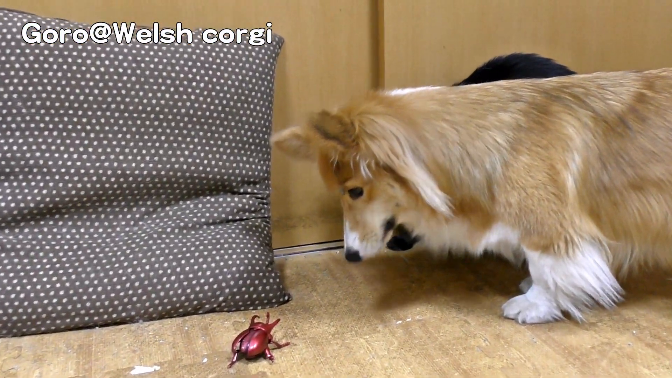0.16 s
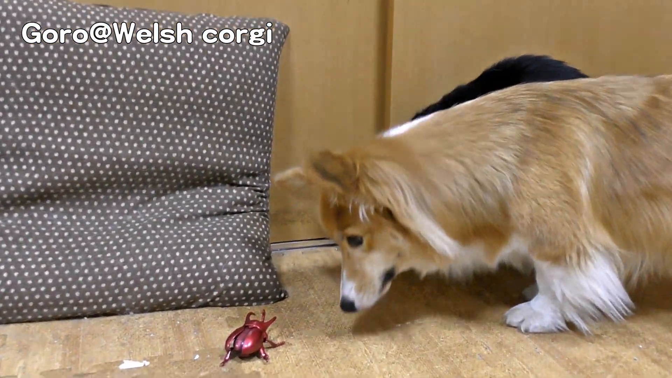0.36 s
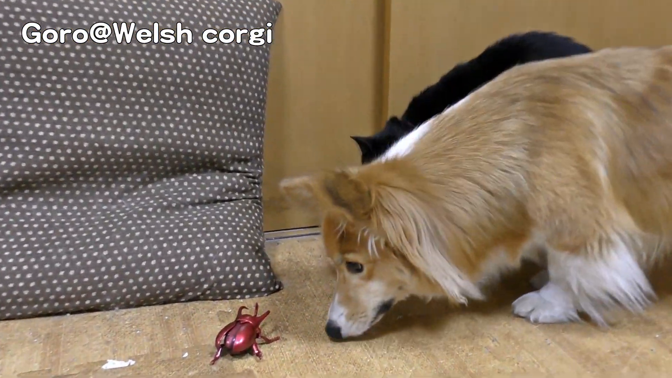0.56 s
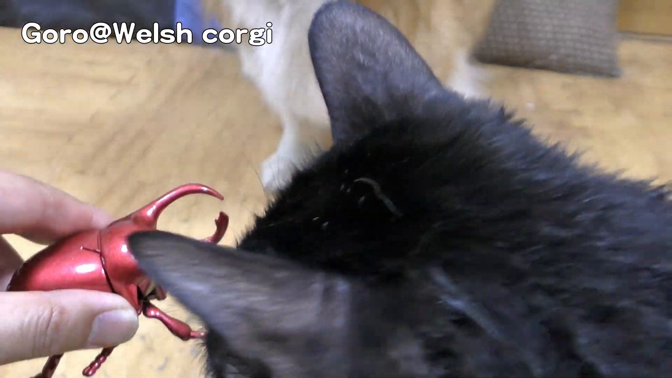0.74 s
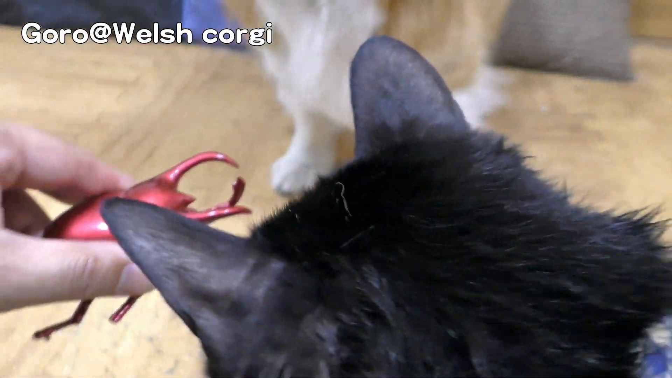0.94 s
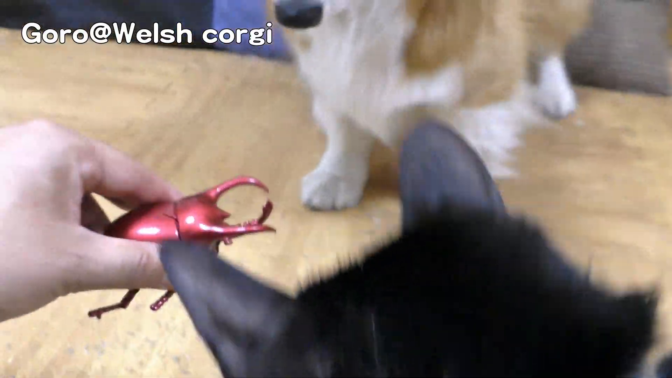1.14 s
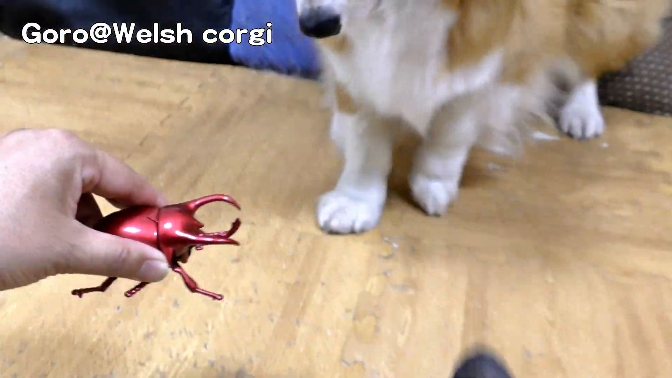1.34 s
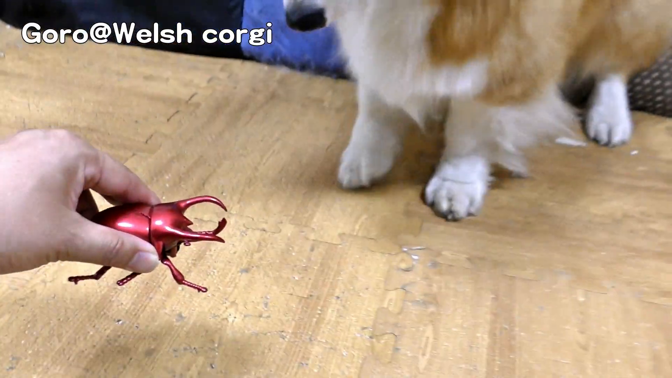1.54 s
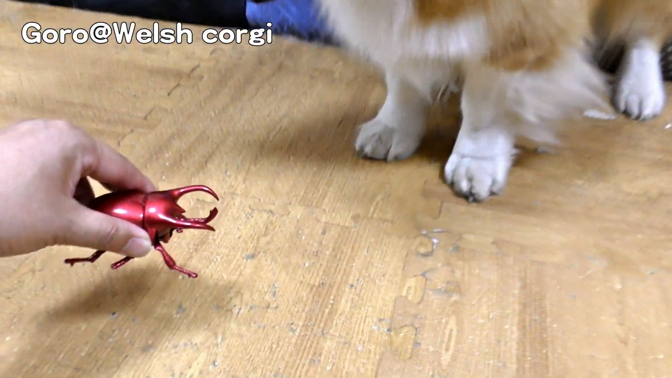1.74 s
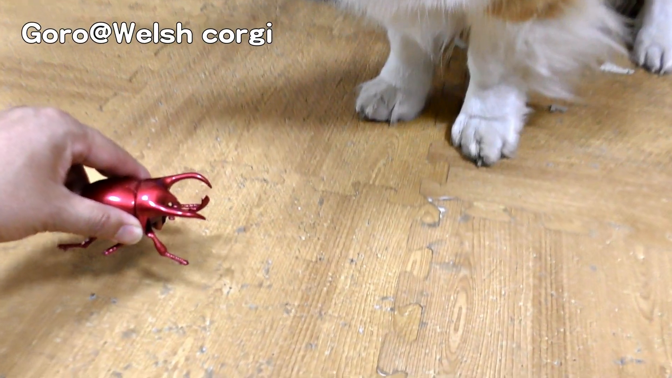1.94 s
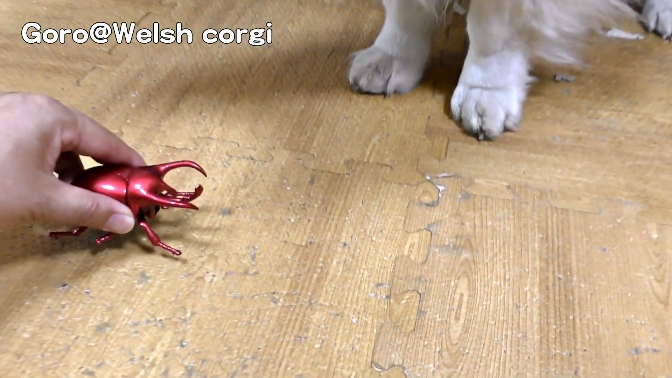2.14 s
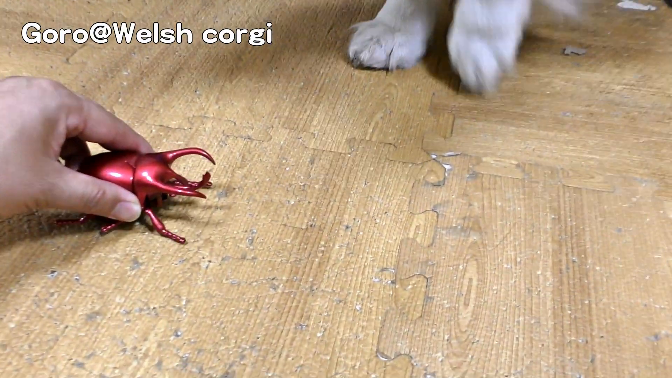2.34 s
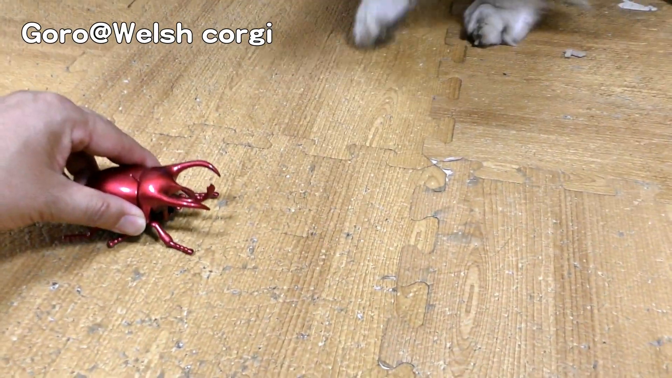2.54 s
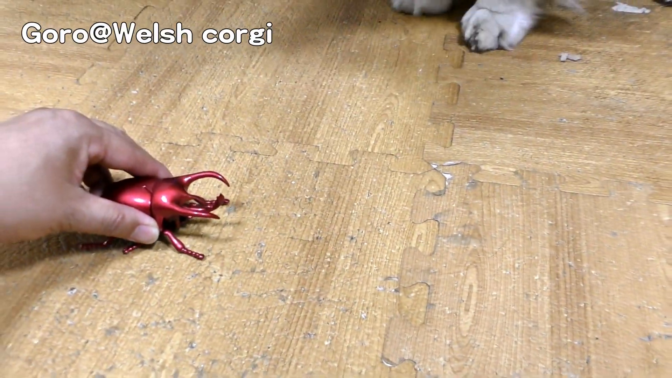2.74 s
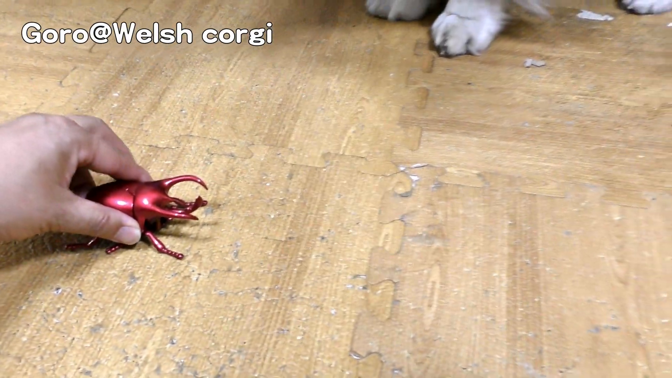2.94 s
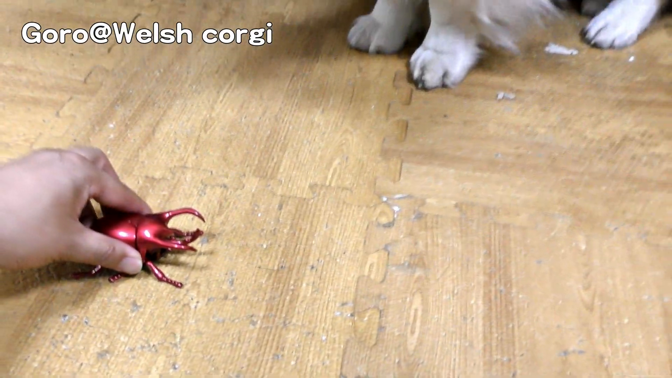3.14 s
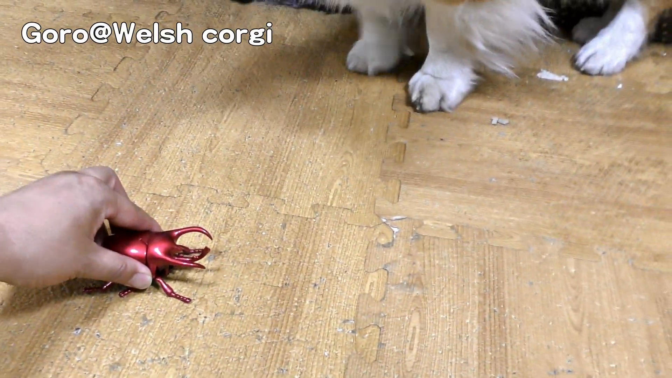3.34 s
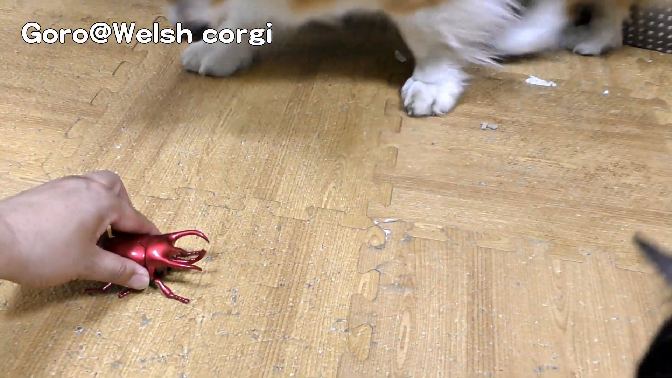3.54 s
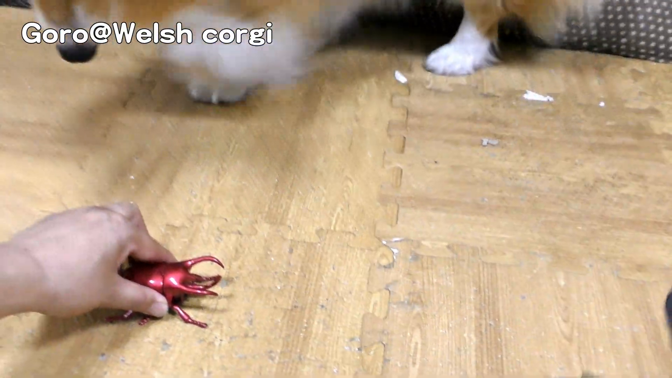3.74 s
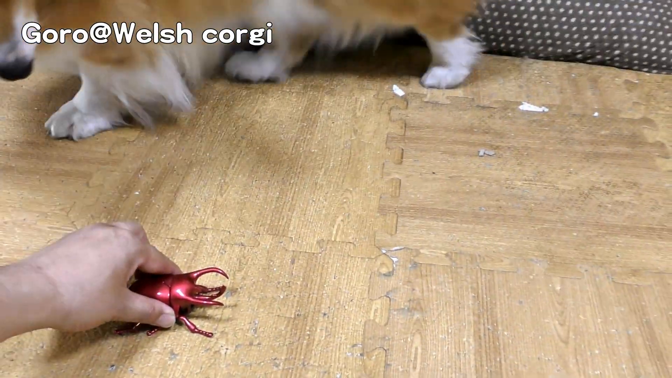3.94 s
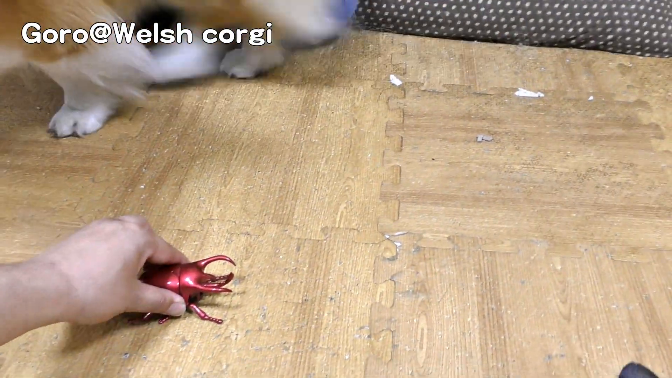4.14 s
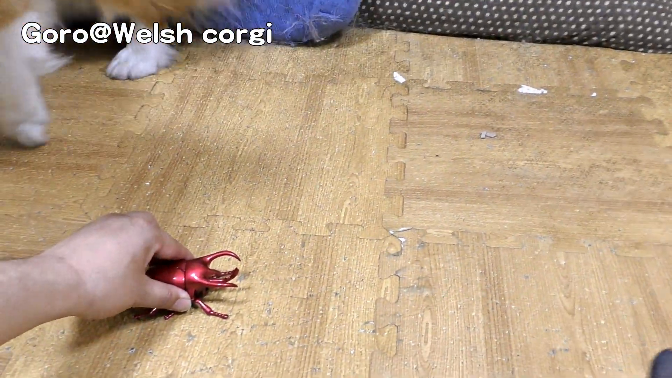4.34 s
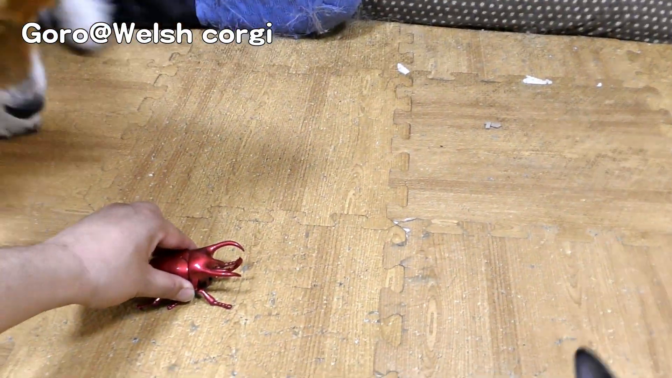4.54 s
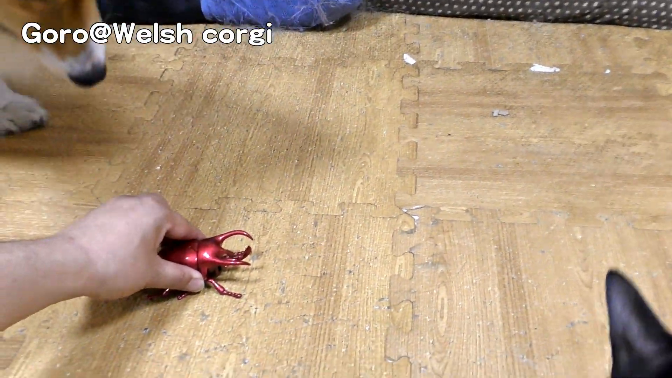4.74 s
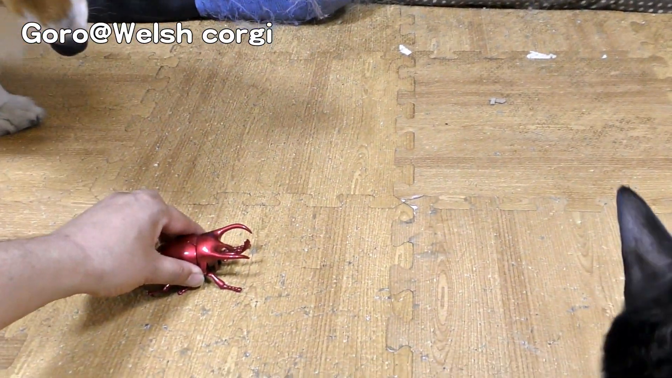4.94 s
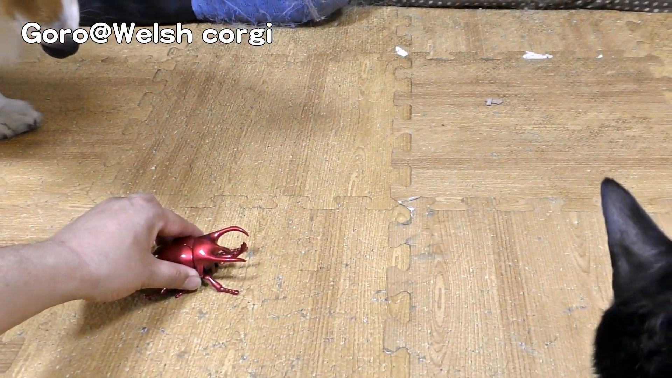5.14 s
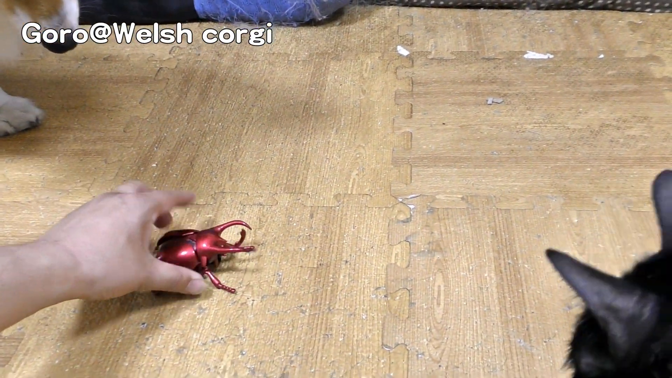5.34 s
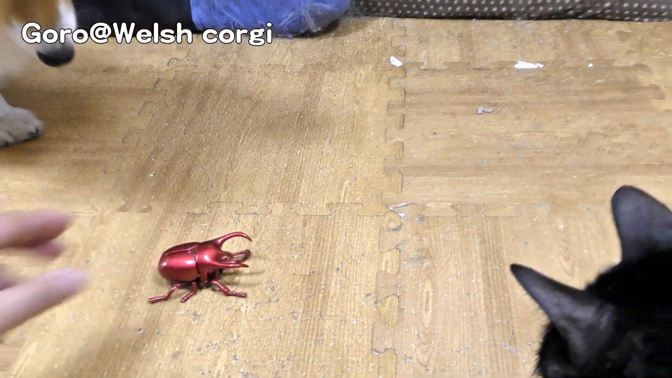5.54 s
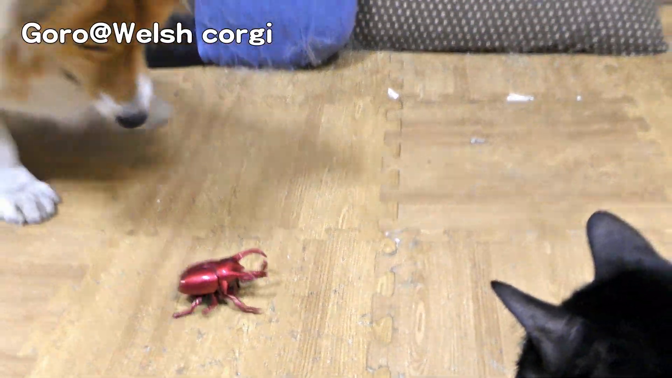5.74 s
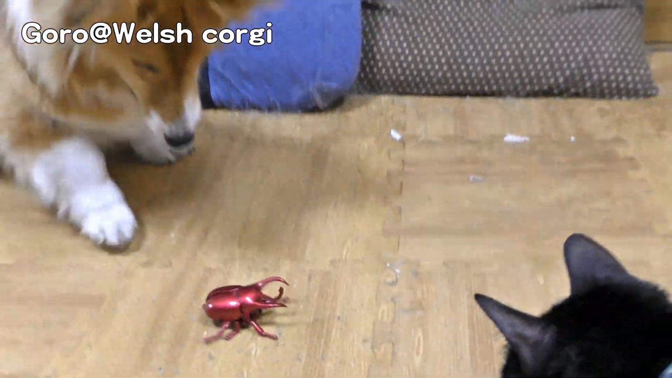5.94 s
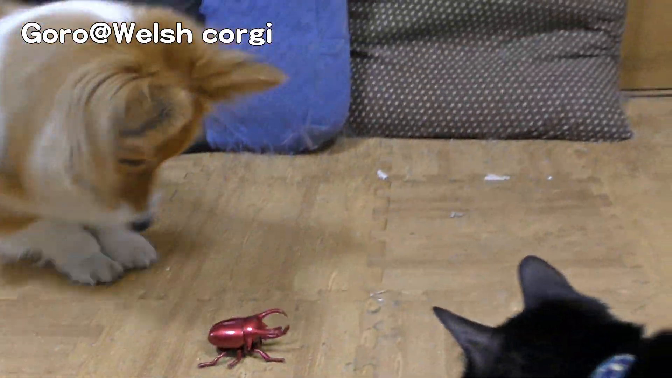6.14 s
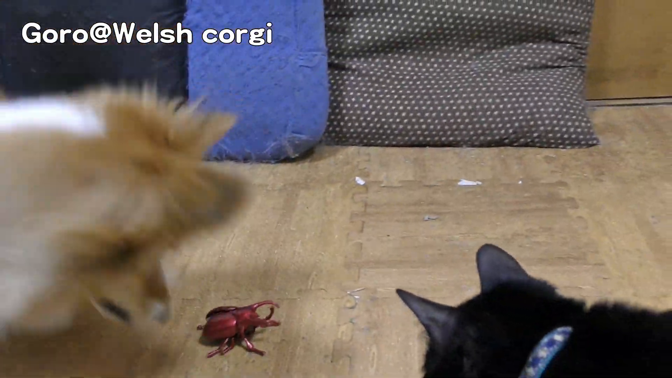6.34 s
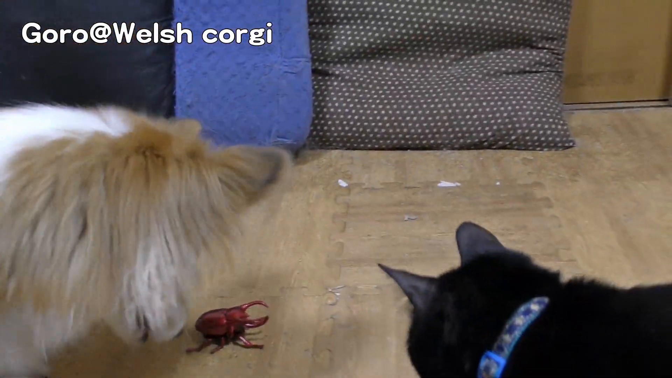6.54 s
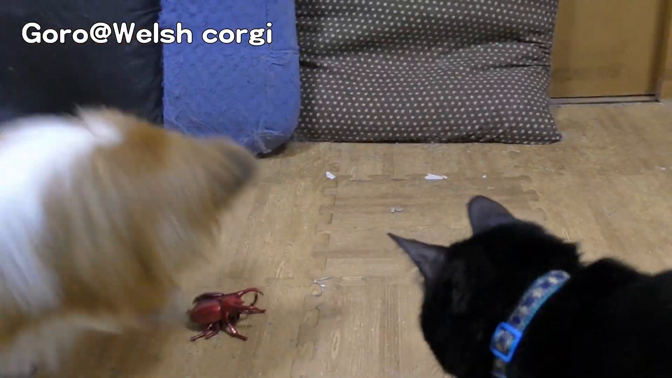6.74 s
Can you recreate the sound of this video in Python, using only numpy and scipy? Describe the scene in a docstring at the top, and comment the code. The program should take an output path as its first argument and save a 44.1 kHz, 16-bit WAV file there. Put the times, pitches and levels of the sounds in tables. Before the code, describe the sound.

In a quiet, faintly humming room, a held toy clicks and scrapes, then is released and rattles away in a bright, pulsing clockwork whirr.

```python
"""First come light clicks, scuffs and rubbing: a hand holds a plastic wind-up beetle while a dog pads about.
Clicks are tiny noise snaps with a body ring, scuffs are grainy puffs, rubbing is noise that swells and fades.
Let go, the beetle whirrs off: escapement blows rattle its shell, slowing and speeding with each push of its legs.
Its legs then tap the mat: a noise tap and a damped low note. The small, quiet living room hums and hisses
throughout, as filtered noise and three tones."""
import sys
import numpy as np
from scipy import signal
from scipy.fft import rfft, irfft, next_fast_len
from scipy.io import wavfile
from scipy.ndimage import uniform_filter1d, map_coordinates

SR = 44100
rng = np.random.default_rng(int(sys.argv[2]) if len(sys.argv) > 2 else 0)


def write(x):
    x = np.atleast_2d(x).T
    wavfile.write(sys.argv[1], SR, np.round(np.clip(x, -1, 1) * 32767).astype(np.int16))

N = 299439
TIME = np.arange(N) / SR  # seconds
TOP_HZ = 15900  # nothing sounds above this

# The room's steady noise, relative levels: pitch_hz, level_db
ROOM_NOISE = [(12, -68), (20, -17), (65, -8), (86, -3.5), (154, -3), (357, -16.5), (388, -17), (513, -19.5),
              (678, -25), (923, -20), (1860, -20), (2260, -19.5), (5380, -37), (12100, -34.5), (16000, -34)]
# How alike the room noise is at left and right: pitch_hz, likeness (1 = the same)
ROOM_LIKENESS = [(25, .55), (70, 0.84), (240, 0.63), (950, 0.35), (3770, 0.38), (15000, 0.62)]
# How long the walls' echo takes to fall by 60 dB: pitch_hz, decay_s
WALL_DECAY = [(200, 0.15), (2000, 0.27), (12000, 0.12)]

# Strokes of hand and toy over the mat: peak_s, rise_s, fall_s, rub_db, hiss_db
STROKES = [(1.25, 0.024, 0.056, -57.5, -63), (1.49, 0.11, 0.14, -63, -61.5), (2.45, 0.29, 0.21, -61, -67.5),
           (3.01, 0.043, 0.24, -51.5, -71), (3.14, 0.11, 0.15, -56.5, -57), (3.72, 0.3, 0.2, -64.5, -69.5),
           (4.0, 0.11, 0.066, -61.5, -59.5), (4.33, 0.18, 0.17, -62.5, -64), (4.77, .05, .09, -50, -61.5),
           (5.288, 0.0066, 0.017, -61.5, -49.5)]
# Tone of the dull rubbing, relative levels: pitch_hz, level_db
RUB_TONE = [(88, -43), (150, -22), (190, -19), (312, -3), (457, -1), (570, -26), (953, -5), (2330, -6),
            (5000, -25.5), (6500, -53), (11000, -120)]
# Tone of the bright rubbing, relative levels: pitch_hz, level_db
HISS_TONE = [(2000, -1), (4000, 4), (7000, -0.5), (11000, 0), (16000, -9)]
GRIP_DB, GRIP_RATE = 1.65, 45  # the fingers catch and slip: depth, random points a second

# Short scuffs of paws and fingers: start_s, level_db, body_hz, decay_s (to fall by 60 dB)
SCUFFS = [(0.377, -44, 1900, 0.12), (1.077, -45, 2680, 0.22), (1.195, -41.5, 1510, 0.11),
          (1.421, -41.5, 2600, 0.37), (1.64, -40.5, 1290, 0.26), (2.482, -38, 1420, 0.072),
          (2.504, -37, 1800, 0.19), (2.575, -40.5, 2560, 0.11), (2.75, -45, 1550, 0.24),
          (3.698, -43, 2230, .08), (3.907, -44.5, 1240, 0.2), (4.002, -50, 2270, 0.77),
          (4.285, -40.5, 1620, 0.11), (4.513, -44.5, 1620, 0.51), (4.564, -42, 1340, 0.14),
          (4.792, -40.5, 1470, 0.34), (4.839, -28, 1290, 0.16)]
SCUFF_TICK_DB = -10  # sets the treble of a scuff

# Claws and plastic parts clicking: start_s, level_db, body_hz, tick_db (higher is brighter)
CLICKS = [(0.258, -36, 1890, -14), (0.342, -17.5, 1830, -6), (0.416, -24.5, 940, -8.5),
          (0.671, -39.5, 1090, -24), (1.186, -28, 1530, -12), (1.366, -33.5, 970, -22),
          (1.421, -20.5, 2080, -15), (1.642, -36, 1230, -24), (2.369, -32, 3600, 13),
          (2.501, -22.5, 1520, -13), (2.75, -31.5, 1590, -27), (2.797, -37.5, 2170, -15),
          (2.975, -33, 650, -26), (3.299, -26, 1290, -39), (3.316, -22, 966, -8.5), (3.508, -33, 2310, -3),
          (3.601, -27.5, 2020, -32), (3.612, -30, 1920, -12), (3.889, -35, 2510, -7),
          (3.909, -36, 1400, -6), (3.955, -32, 2440, -9), (3.976, -26, 2950, 0.5), (4.002, -32, 1860, -1),
          (4.068, -34.5, 2560, -12), (4.188, -32.5, 1330, -7), (4.216, -36, 2500, 3),
          (4.274, -26.5, 2820, -8.5), (4.335, -32.5, 2870, -12), (5.071, -36, 2170, -10),
          (5.276, -26.5, 2340, 12.5)]
KNOCK_DB, KNOCK_DB_PER_OCTAVE = -6.5, -12  # low knock of a 1 kHz body; higher-pitched bodies knock less
FIDGET_COUNT, FIDGET_LOUDEST_DB = 18, -41.5  # faint ticks of the toy in the fingers
HELD_START_S, HELD_END_S = 2.3, 4.9  # the toy is pressed to the mat

# Soft paw falls: start_s, level_db, pitch_hz
PAWS = [(1.188, -48.5, 181), (1.443, -43, 148), (3.999, -47.5, 223), (4.288, -42.5, 178),
        (4.602, -47.5, 240), (4.706, -43.5, 238), (4.862, -38, 169)]
# The beetle's legs landing on the mat: start_s, tap_db, thud_db
LEG_STEPS = [(5.734, -37, -37), (5.808, -50, -40), (5.871, -34, -39.5), (5.973, -31.5, -40.5),
             (6.058, -49, -39), (6.218, -33.5, -37), (6.250, -38, -37), (6.392, -29.5, -37),
             (6.494, -34, -38.5), (6.525, -28, -41), (6.558, -37.5, -33), (6.617, -36.5, -37.5),
             (6.758, -22, -33.5)]
# Tone of a leg tip's tap, relative levels: pitch_hz, level_db
TAP_TONE = [(180, -20), (300, -5), (674, -19), (1480, -3), (1960, -2), (2270, -3), (3000, -36), (3900, -41),
            (6600, -120)]
# Tone of the soft mat, relative levels: pitch_hz, level_db
MAT_TONE = [(30, -22), (80, 0), (140, 0), (320, -6), (600, -20), (2000, -38)]
LEG_THUD_HZ, LEG_THUD_SPREAD = 198, .2  # middle of the mat's notes, their random spread as a share
THUD_LAG_S = 0.00405  # the thud follows the tip's tap

# Tone of the plastic shell with the hand still close, relative levels: pitch_hz, level_db
SHELL_HELD_TONE = [(530, -65), (900, -34), (1050, -21.5), (1320, -11.5), (1910, -19.5), (2200, -8),
                   (3110, 0.5), (4080, -8), (4660, -2.5), (5310, -8), (7320, -5), (8050, -7), (10800, -1.5),
                   (15500, -13.5)]
# Tone of the shell walking free, relative levels: pitch_hz, level_db
SHELL_FREE_TONE = [(530, -31.5), (900, -33.5), (1170, -16), (1500, -17.5), (1980, -16), (2790, -0.5),
                   (3070, -2), (3760, -10), (4330, -3.5), (5500, -13.5), (6650, -3.5), (8150, -7),
                   (8960, -4), (10800, -1), (15500, -17.5)]
# Each push of the legs brakes the clockwork; gears take part of the rattle dip: peak_s, rattle_dip_db, shell_dip_db
PUSHES = [(5.479, 7, 5.5), (5.658, 6, 5.5), (5.810, 7, 4.5), (6.004, 3.5, 0.5), (6.162, 6, 2),
          (6.360, 7, 4.5), (6.512, 5.5, 1.5), (6.716, 5.5, 9)]
RELEASE_S = 5.312  # the hand lets the spring go
STEEL_DB, GEARS_DB, SHELL_DB = -29, -33, -35  # base levels of steel rattle, gear clatter and shell ring
SPIN_UP_DB, SPIN_UP_S = 17, .025  # how far below speed steel and gears start, how fast they catch up
LOAD_S, UNLOAD_S = .04, .022  # a push loads the spring slowly and lets go quickly
FILL_DB, FILL_S = 4, .05  # the shell's ring lags behind the wheels: by how much, for how long
STEEL_SURGE_DB, STEEL_SURGE_S = 7.5, .18  # the escapement races while the legs are still unloaded
BODY_SURGE_DB, BODY_SURGE_S = 5.4, 0.24  # gears settle more slowly; the shell takes part of this surge


def amp(db):
    """Decibels to gain."""
    return 10 ** (np.asarray(db) / 20)


def unit(x):
    """Bring a sound to an average strength (rms) of 1."""
    return x / np.sqrt(np.mean(x ** 2) + 1e-20)


def along(points, hz):
    """Read a (pitch_hz, value) table at any pitch, on a log pitch scale."""
    f, v = np.transpose(points)
    return np.interp(np.log(hz + 1), np.log(f + 1), v)


def wobble(rate):
    """A smooth random curve through this many random points a second."""
    return map_coordinates(rng.standard_normal(int(N * rate / SR) + 4), [TIME * rate])


def coloured(x, points):
    """Filter a sound to the gains of a (pitch_hz, level_db) table, with no sound ahead of its cause."""
    n = x.shape[-1]
    m = 2 * next_fast_len(n // 2 + 2048)
    log_gain = np.log(amp(along(points, np.fft.rfftfreq(m, 1 / SR))))
    # Folding the cepstrum forward in time makes the filter minimum phase.
    cepstrum = irfft(log_gain)
    cepstrum[1:m // 2] *= 2
    cepstrum[m // 2 + 1:] = 0
    return irfft(rfft(x, m) * np.exp(rfft(cepstrum)), m)[..., :n]


def below(x, hz):
    """The part of a sound under a given pitch."""
    return signal.sosfiltfilt(signal.butter(6, hz, fs=SR, output="sos"), x)


def add(track, s, sound):
    """Mix a sound into a track at time s."""
    part = track[round(s * SR):][:len(sound)]
    part += sound[:len(part)]


def burst(t60, attack, points, grain_db):
    """A coloured, grainy puff of noise that rises and dies (t60: seconds to fall by 60 dB)."""
    t = np.arange(SR // 3) / SR
    shape = amp(-60 * t / max(t60, .003)) * (1 - np.exp(-t / attack))
    knots = t[::60]
    grain = unit(amp(grain_db * np.interp(t, knots, rng.standard_normal(len(knots)))))
    puff = coloured(shape * grain * rng.standard_normal(len(t)), points)
    # The table sets only the tone: the puff's energy is brought back to that of its shape.
    return puff / np.sqrt(np.sum(puff ** 2) / np.sum(shape ** 2)) / shape.max() / 2


def contact_colour(body_hz, tick_db):
    """Tone of a contact: a low knock, one broad body resonance and a bright tick."""
    hz = np.geomspace(60, 16000, 60)
    knock_db = KNOCK_DB + KNOCK_DB_PER_OCTAVE * np.log2(body_hz / 1000)
    broad = [(60, knock_db - 5), (280, knock_db + 10), (680, knock_db / 2 - 5.0), (1050, -2.0), (3400, -6.0),
             (5500, tick_db - 7.5), (10500, tick_db - 3.0), (16000, tick_db - 18)]
    resonance_db = 9.6 * np.exp(-(np.log(hz / body_hz) / 0.25) ** 2)
    return np.transpose([hz, along(broad, hz) + resonance_db])


def in_room(x, wet_db, near_db, left_over_right_db):
    """Direct sound, a quick scatter off floor and bodies, and the walls' tail."""
    hz, t, z = signal.stft(rng.standard_normal((2, SR // 3)), SR, nperseg=256)
    tail = signal.istft(z * amp(-60 * t / along(WALL_DECAY, hz)[:, None]), SR, nperseg=256)[1]
    scatter = rng.standard_normal(tail.shape) * amp(-60 * np.arange(tail.shape[1]) / SR / 0.038)
    answer = amp(wet_db) * tail / np.linalg.norm(tail[0])
    answer = answer + amp(near_db) * scatter / np.linalg.norm(scatter[0])
    delayed = np.pad(np.atleast_2d(x), ((0, 0), (30, 0)))  # echoes start 30 samples late
    echoes = signal.fftconvolve(delayed, answer, axes=1)[:, :N]
    return (x + echoes) * amp([[left_over_right_db / 2], [-left_over_right_db / 2]])


def background():
    """Low household rumble with a faint hum, under an even hiss."""
    # Shared and opposite parts are mixed so that left and right are as alike as the table asks.
    turn = np.arccos(np.clip(along(ROOM_LIKENESS, np.fft.rfftfreq(N, 1 / SR)), -1, 1)) / 2
    noise = coloured(rng.standard_normal((2, N)), ROOM_NOISE)
    mid, side = irfft(rfft(noise) * [np.cos(turn), np.sin(turn)], N)
    hum = np.zeros(N)
    for hz, db in [(97, -67.0), (147, -62.5), (1885, -74.5)]:
        hum += amp(db + 0.91 * wobble(4.7)) * np.sin(2 * np.pi * hz * TIME + wobble(3.1))
    air = amp(-57.0) * unit(np.array([mid + side, mid - side]))
    return (air + hum) * amp([[-.7], [.7]])  # a little louder on the right


def friction_grains(tone):
    """Noise whose strength flickers finely, like many tiny catches of friction."""
    return unit(coloured(rng.standard_normal(N) * amp(2.3 * wobble(500)), tone))


def rubbing():
    """Fine grains of friction under the hand's strokes, each swelling and fading."""
    rub, hiss = np.zeros((2, N))
    for s, rise, fall, rub_db, hiss_db in STROKES:
        distance = np.clip((TIME - s) / np.where(TIME < s, rise, fall), -20, 20)
        swell = 1 / np.cosh(distance * np.sqrt(2))
        # Overlapping strokes add by power.
        rub = np.hypot(rub, amp(rub_db) * swell)
        hiss = np.hypot(hiss, amp(hiss_db) * swell)
    grip = amp(GRIP_DB * wobble(GRIP_RATE))
    return rub * grip * friction_grains(RUB_TONE) + hiss * friction_grains(HISS_TONE)


def scuffs():
    """Short slides that catch and slip on the mat's grain."""
    track = np.zeros(N)
    for s, db, body_hz, t60 in SCUFFS:
        add(track, s, amp(db) * burst(t60, 0.0019, contact_colour(body_hz, SCUFF_TICK_DB), grain_db=3.0))
    return track


def fidgets():
    """Faint random ticks while the toy is held, as rows like CLICKS."""
    rows = []
    for when, softness, size, hardness in rng.random((FIDGET_COUNT, 4)):
        start_s = HELD_START_S + (HELD_END_S - HELD_START_S) * when
        rows.append((start_s, FIDGET_LOUDEST_DB - 6 * softness, 1700 + 1300 * size, -9 + 12 * hardness))
    return rows


def clicks():
    """Hard contacts: a very short snap with the struck body's brief, duller ring."""
    track = np.zeros(N)
    for s, db, body_hz, tick_db in list(CLICKS) + fidgets():
        snap = burst(.003, .00005, contact_colour(body_hz, tick_db + 3), grain_db=0)
        ring = burst(0.032, 0.00036, contact_colour(body_hz, tick_db - 2), grain_db=4)
        add(track, s, amp(db) * (snap + amp(-5.5) * ring))
    return track


def thud(hz):
    """Weight on the mat: a dull, quickly damped note and a soft puff."""
    t = np.arange(SR // 3) / SR
    note = np.sin(2 * np.pi * hz * t) * amp(-60 * t / 0.12) * (1 - np.exp(-t / 0.001))
    return note + amp(-1.5) * burst(0.32, 0.0019, MAT_TONE, grain_db=2)


def steps():
    """The beetle's hard tips tap the mat and then thud into it; paws only thud."""
    track = np.zeros(N)
    for s, tap_db, thud_db in LEG_STEPS:
        add(track, s, amp(tap_db) * burst(0.082, 0.00057, TAP_TONE, grain_db=7))
        thud_hz = LEG_THUD_HZ * np.exp(LEG_THUD_SPREAD * rng.standard_normal())
        add(track, s + THUD_LAG_S, amp(thud_db) * thud(thud_hz))
    for s, db, hz in PAWS:
        add(track, s, amp(db) * thud(hz))
    return track


def drive():
    """Levels of steel, gears and shell: a surge on release, then a dip with every push of the legs."""
    age = np.maximum(TIME - RELEASE_S, 0)
    spin_up_db = SPIN_UP_DB * np.exp(-age / SPIN_UP_S)
    steel_surge_db = STEEL_SURGE_DB * np.exp(-(age / STEEL_SURGE_S) ** 2) - spin_up_db
    body_surge_db = BODY_SURGE_DB * np.exp(-(age / BODY_SURGE_S) ** 2) - spin_up_db
    lag_db = FILL_DB * np.exp(-(age / FILL_S) ** 2)
    rattle_dip, shell_dip = np.zeros((2, N))
    for s, rattle_db, shell_db in PUSHES:
        load = np.exp(-((TIME - s) / np.where(TIME < s, LOAD_S, UNLOAD_S)) ** 2)
        rattle_dip += rattle_db * load
        shell_dip += shell_db * load
    steel_db = STEEL_DB + steel_surge_db - rattle_dip + .3 * wobble(30)
    gears_db = GEARS_DB + body_surge_db - 0.37 * lag_db - 0.53 * rattle_dip + 0.61 * wobble(25)
    shell_db = SHELL_DB + .8 * body_surge_db - lag_db - shell_dip + 0.56 * wobble(35)
    return steel_db, gears_db, shell_db


def escapement(level_db, running, jitter_s, scatter_db, rebound_db):
    """Blows of the two pallets, one row each: a lighter load means faster and harder beats."""
    # The speed follows the level a little late.
    lagged_db = uniform_filter1d(np.where(running, level_db, -45), size=1300, origin=400)
    teeth_hz = 245 * amp(.38 * (lagged_db + 29))
    turned = np.cumsum(2 * teeth_hz * running) / SR  # two beats a tooth
    beats = np.searchsorted(turned, np.arange(int(turned[-1])) + 1e-6)
    chance = rng.standard_normal((len(beats), 4))
    pallet = np.arange(len(beats)) % 2
    at = beats + jitter_s * SR * chance[:, 0]
    size = amp(scatter_db * chance[:, 1] - 3 * pallet)  # the second pallet strikes more softly
    # The loose anchor chatters after each blow.
    rebound_at = at + SR * .0008 * np.exp(.35 * chance[:, 2])
    rebound_size = size * amp(rebound_db + 0.44 * chance[:, 3])
    blows = np.zeros((2, N))
    for when, force in (at, size), (rebound_at, rebound_size):
        np.add.at(blows, (pallet, np.clip(when, 0, N - 1).astype(int)), force)
    return blows


def shell_ring(blows, dying):
    """Each pallet rings its own dense modes, which blend anew as the legs shift the body."""
    ring = np.zeros(N)
    for pallet in blows:
        poses = np.array([wobble(6) for _ in range(6)])
        modes = dying * rng.standard_normal((6, len(dying)))
        rings = signal.fftconvolve(pallet[None], modes, axes=1)[:, :N]
        ring += np.sum(poses * rings, 0) / np.linalg.norm(poses, axis=0)
    return unit(ring)


def delayed_by(x, seconds):
    """Each side of a sound, late by a changing time."""
    return np.array([map_coordinates(c, [(TIME - seconds) * SR]) for c in x])


def with_reflection(x):
    """The sound also bounces off the mat and the leaving hand; the changing detour sweeps its colour."""
    hand_s = np.interp(TIME, [5.45, 5.62], [.0003, .0011])
    hand_share = np.interp(TIME, [5.55, 5.66], [.22, 0])
    mat_s = 0.000339 * np.exp(0.18 * wobble(11))  # the body rocks on its legs
    return x + hand_share * delayed_by(x, hand_s) + .2 * delayed_by(x, mat_s)


def even(band):
    """Smooth out a band's slow changes in loudness, so that drive() can set its level."""
    return band / np.sqrt(np.abs(uniform_filter1d(band.mean(0) ** 2, size=1500)) + 1e-4)


def clockwork():
    """Each beat cracks through the gears and rings the shell; its highest ring spreads unevenly to both sides."""
    steel_db, gears_db, shell_db = drive()
    running = TIME > RELEASE_S
    blows = escapement(steel_db, running, jitter_s=.00012, scatter_db=1.7, rebound_db=-5)
    t = np.arange(SR // 25) / SR
    # A quick fall, then a weaker, longer one.
    dying = (amp(-60 * t / .0035) + amp(-13) * amp(-60 * t / .03)) * (1 - np.exp(-t / .00015))
    crack_power = np.abs(signal.fftconvolve(np.sum(blows ** 2, 0), dying ** 2)[:N])
    crack = np.sqrt(crack_power) * rng.standard_normal(N)
    beats = unit(.45 * unit(crack) + shell_ring(blows, dying))
    side = coloured(shell_ring(blows, dying), [(4000, -49), (9000, -34), (13000, -8.5)])
    pair = with_reflection(np.array([beats + side, beats - side]))
    # The tone passes from the held shell to the free one.
    free = np.interp(TIME, [5.55, 5.65], [0, 1])
    held_sound = unit(coloured(pair, SHELL_HELD_TONE))
    free_sound = unit(coloured(pair, SHELL_FREE_TONE))
    rattle = (1 - free) * held_sound + free * free_sound
    below_steel, below_gears = below(rattle, 8500), below(rattle, 4000)
    # The steel band is a little louder on the left than on the right.
    steel = amp(steel_db) * even(rattle - below_steel) * amp([[.6], [-.6]])
    gears = amp(gears_db) * even(below_steel - below_gears)
    shell = amp(shell_db) * even(below_gears)
    return steel + gears + shell


def scene():
    """All sources in the room."""
    toy = in_room(clockwork(), wet_db=-12.5, near_db=-28, left_over_right_db=0.44)
    ticking = in_room(clicks(), wet_db=-15.5, near_db=-9.5, left_over_right_db=1.5)
    handling = in_room(scuffs() + rubbing(), wet_db=-12.5, near_db=-5.5, left_over_right_db=1.0)
    stepping = in_room(steps(), wet_db=-6.5, near_db=-10, left_over_right_db=-1.3)
    return background() + handling + ticking + stepping + toy


def record(dry):
    """Keep nothing at or above the band limit."""
    m = next_fast_len(N + SR // 2)
    return irfft(rfft(dry, m) * (np.fft.rfftfreq(m, 1 / SR) < TOP_HZ), m)[:, :N]


dry = scene()
out = record(dry)
write(out)
```